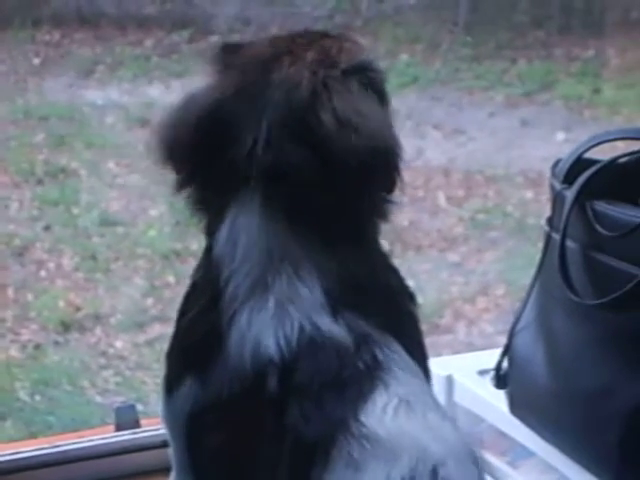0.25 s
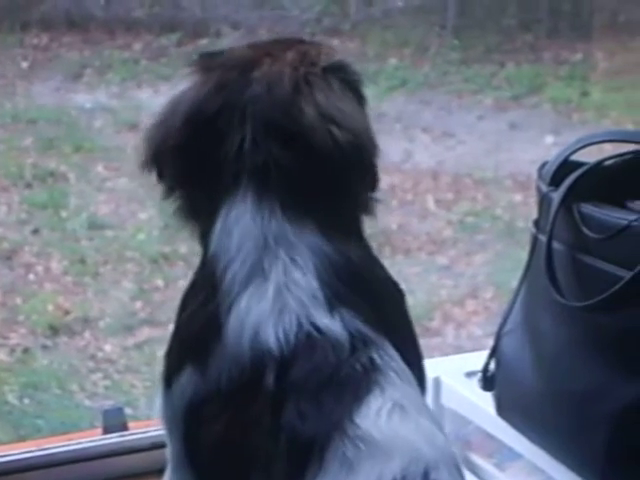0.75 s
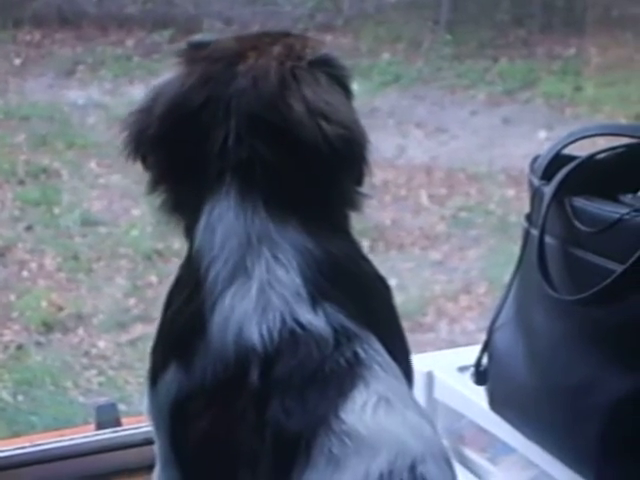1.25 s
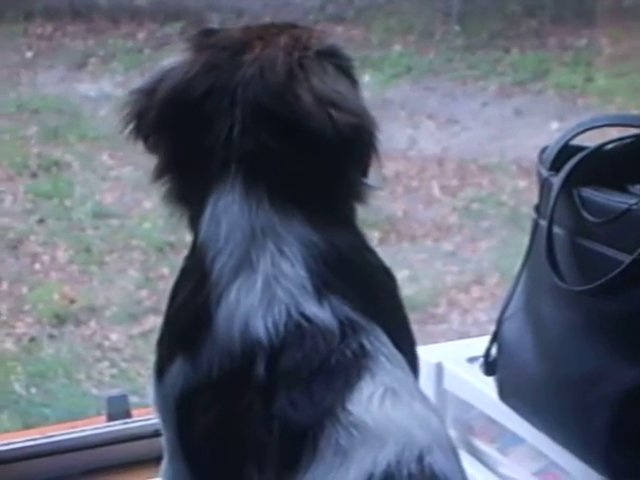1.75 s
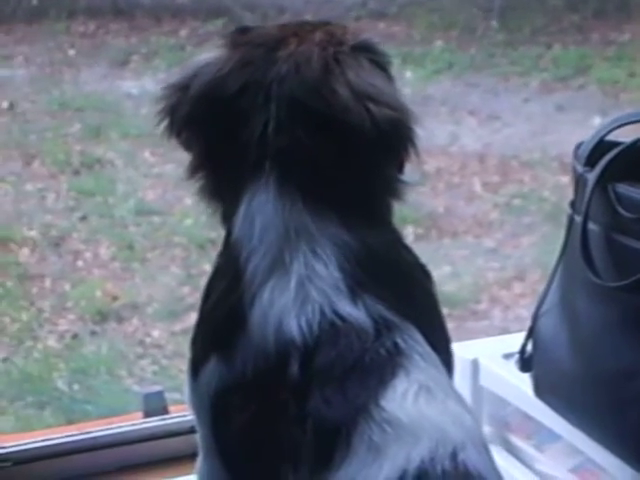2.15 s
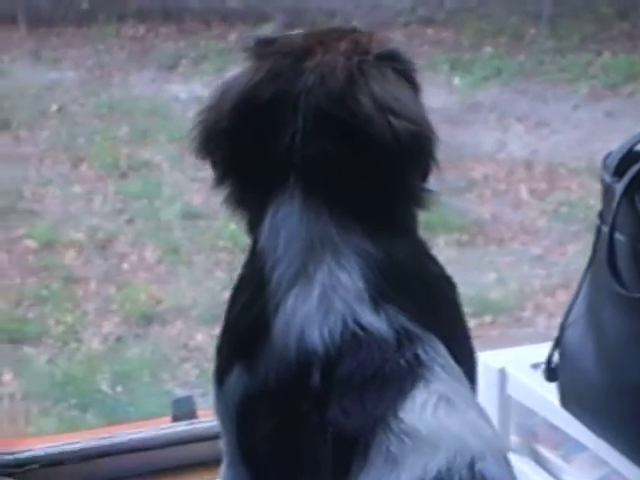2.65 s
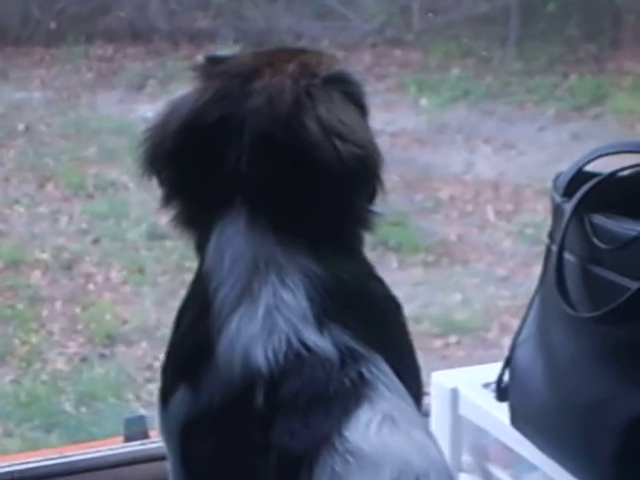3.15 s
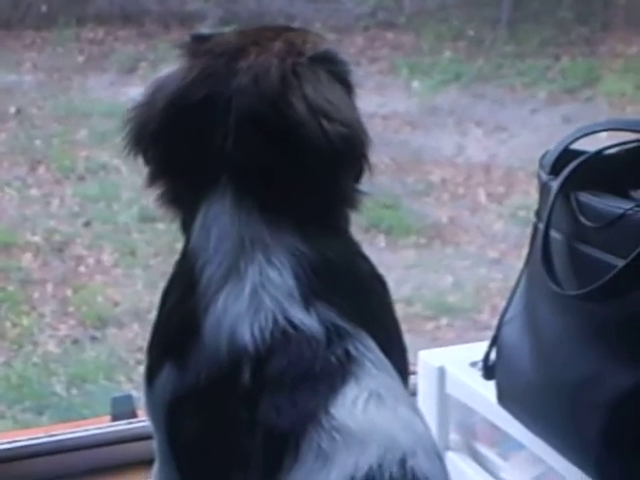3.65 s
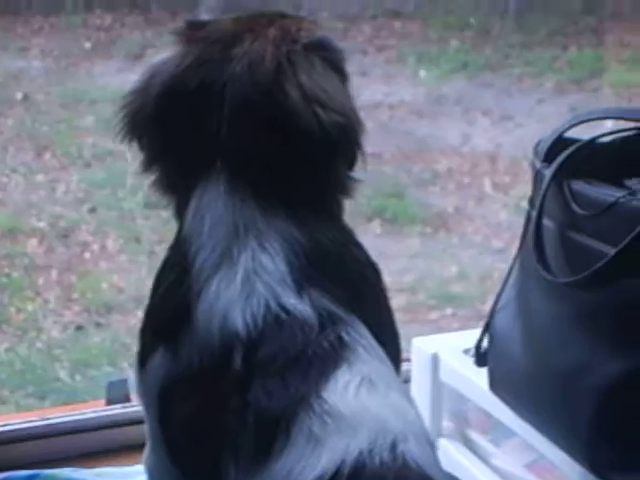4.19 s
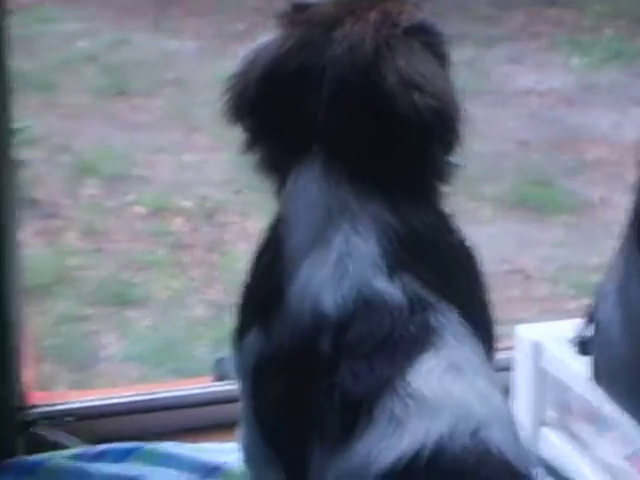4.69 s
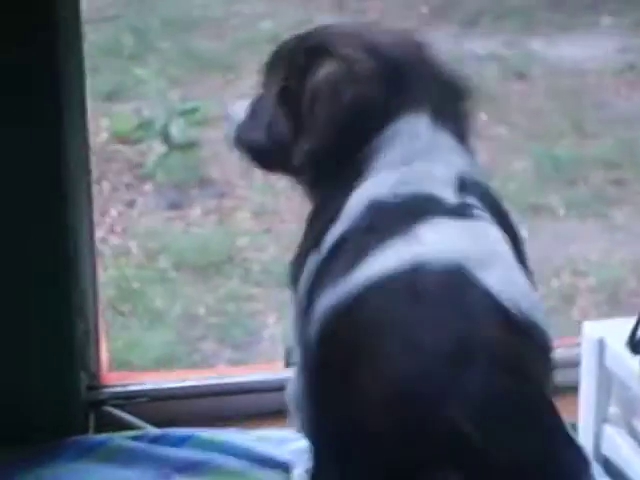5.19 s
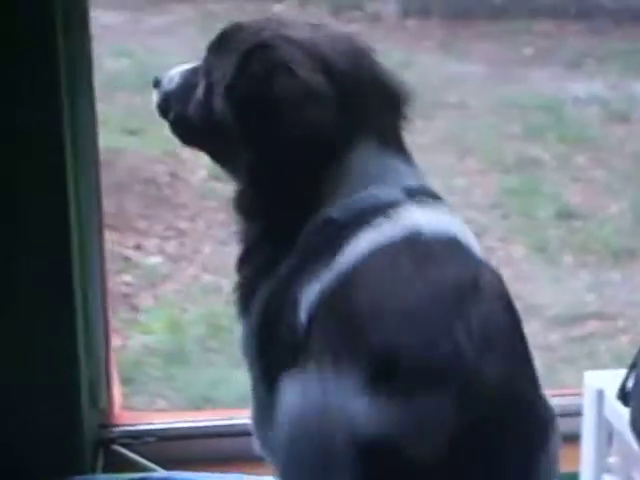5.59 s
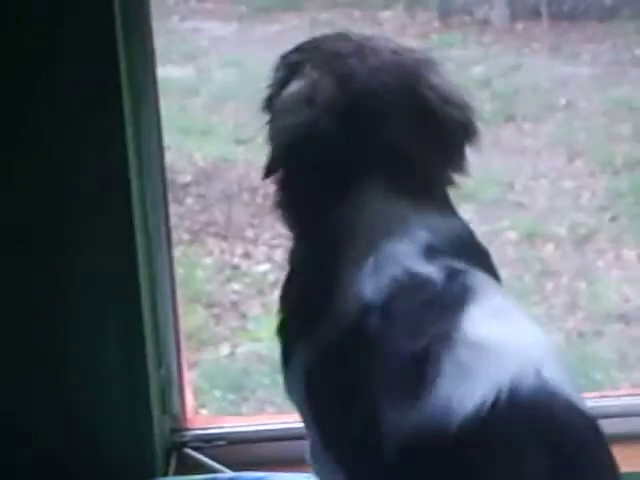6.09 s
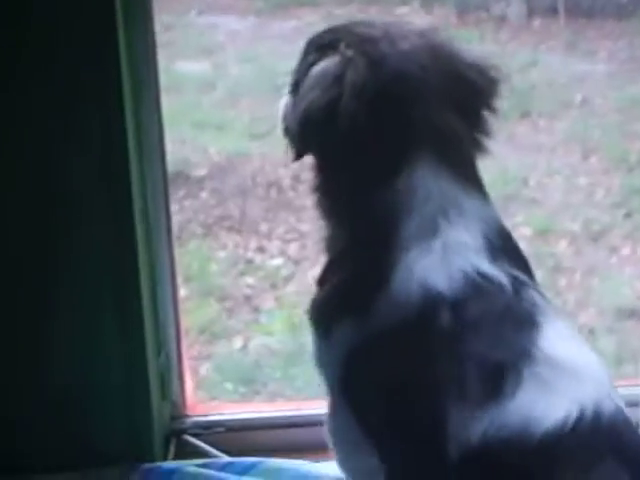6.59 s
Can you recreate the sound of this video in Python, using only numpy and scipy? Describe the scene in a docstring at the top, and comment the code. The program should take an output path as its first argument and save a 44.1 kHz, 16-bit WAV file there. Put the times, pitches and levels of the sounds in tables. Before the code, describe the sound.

A young dog chuffs, barks sharply, sniffs and growls low, then barks again and chuffs twice, close by in a small room.

```python
"""A young dog at a window, close to the microphone in a small room, is alarmed by something outside.
It chuffs (muffled half barks), barks, sniffs, growls, barks again into a snarl and chuffs some more.
Its voice is the vocal folds pulsing through throat and mouth; its sniffs and snorts are rushing air.
The two full barks overload the microphone. A few dry ticks sound, and a soft hiss, a low drone
and a thin whine lie underneath."""
import sys
import numpy as np
from scipy import signal
from scipy.fft import rfft, irfft, next_fast_len
from scipy.io import wavfile
from scipy.ndimage import uniform_filter1d

SR = 44100
rng = np.random.default_rng(int(sys.argv[2]) if len(sys.argv) > 2 else 0)


def pcm_store(signal):
    """Save signal as 16-bit PCM."""
    levels = np.round(np.clip(np.atleast_2d(signal), -1, 1) * 32767)
    wavfile.write(sys.argv[1], SR, levels.astype(np.int16).T)


N = 301400

# A small dog gives off little bass. Each row: frequency in Hz, gain in dB.
SMALL_BODY = [(60, -25), (100, -11.5), (145, 0)]


def amp(db):
    """Turns decibels into a number to multiply by."""
    return 10 ** (np.asarray(db) / 20)


def evened(x):
    """Scales a signal so that its average strength (rms) is 1."""
    return x / np.sqrt(np.mean(x ** 2) + 1e-20)


def steadied(x, size=700):
    """Holds the strength near 1 over every stretch of `size` samples."""
    return x / np.sqrt(abs(uniform_filter1d(x ** 2, size)) + 1e-20)


def look_up(points, hz):
    """Reads between the rows of a table, giving each octave equal space."""
    f, value = np.transpose(points)
    return np.interp(np.log(hz + 1), np.log(f + 1), value)


def ramp(t, start, length):
    """Goes from 0 to 1 in a straight line."""
    return np.clip((t - start) / length, 0, 1)


def blend(a, b, share):
    """Goes from a to b as share goes from 0 to 1."""
    return a + (b - a) * share


def add(mix, start, sound):
    """Adds a sound to the mix at `start` seconds."""
    part = mix[max(round(start * SR), 0):][:len(sound)]
    part += sound[:len(part)]


def noise(t):
    """White noise, one sample for each of the times t."""
    return np.resize(np.roll(rng.standard_normal(N), -int(t[0] * SR)), len(t))


def wobble(t, hz):
    """A random wavering of strength 1, mostly slower than hz."""
    f = np.fft.rfftfreq(len(t), 1 / SR)
    return evened(irfft(rfft(noise(t)) * np.exp(-(f / hz) ** 2) * (f > 0), len(t)))


def colour(x, points):
    """Turns frequencies up or down. Each point: frequency in Hz, gain in dB."""
    size = next_fast_len(len(x) + 4096)
    gain = amp(look_up(points, np.fft.rfftfreq(size, 1 / SR)))
    return irfft(rfft(x, size) * gain, size)[:len(x)]


def resonate(x, hz, width, order=1):
    """A resonance: keeps the sound near a fixed or moving hz; order 2 cuts the rest more steeply."""
    turn = np.exp(2j * np.pi * np.cumsum(hz * np.ones(len(x))) / SR)
    decay = np.exp(-np.pi * width * order / SR)
    shifted = x / turn
    for _ in range(order):
        shifted = signal.lfilter([1 - decay], [1, -decay], shifted + 1e-18)
    return 2 * (turn * shifted).real


def cavity(x, resonances):
    """Rings a sound as a hollow space does. Each resonance: frequency in Hz, width in Hz, gain in dB."""
    size = next_fast_len(len(x) + 2048)
    f = abs(np.fft.fftfreq(size, 1 / SR))
    power = sum(amp(db) ** 2 / (1 + ((f - hz) / width) ** 2 * 2) ** 3 for hz, width, db in resonances)
    response = np.exp(np.conj(signal.hilbert(.5 * np.log(power + 1e-9))))  # rings after, never before
    return np.fft.ifft(np.fft.fft(x, size) * response).real[:len(x)]


def swell(t, peak, rise, fall):
    """A push of breath: rises smoothly, then dies away."""
    return np.exp(-(np.minimum(t - peak, 0) / rise) ** 2 - np.maximum(t - peak, 0) / fall)


def background(whine_hz=7418):
    """Room hiss, a low drone that swells once and sinks back, and a thin electronic whine."""
    # The tone of the quiet room. Each row: frequency in Hz, relative level in dB.
    hiss_shape = [(15, -8), (50, -3.5), (130, -6), (250, -15), (400, -20), (700, -21.5), (1400, -25),
                  (2100, -26), (3000, -26), (6000, -31.5), (10000, -34.5), (15000, -38)]
    t = np.arange(N) / SR
    hiss = amp(-65) * evened(colour(noise(t), hiss_shape))
    drone = evened(cavity(noise(t), [(74.5, 11, -3), (152, 46, -7)]))
    drone_db = -73 + 11.5 * np.exp(-((t - 1.5) / 1.9) ** 2)  # loudest at 1.5 seconds
    whine = np.sin(2 * np.pi * np.cumsum(whine_hz + 3 * wobble(t, 30)) / SR)
    return hiss + amp(drone_db) * drone + amp(-79) * whine


def vocal_folds(t, hz, rough, jitter, shimmer=.94, wobble_hz=220):
    """Pulses that get more uneven and breathy as `rough` nears 1; also returns their lowest tone."""
    rough = np.clip(rough, 0, 1)
    cycles = np.cumsum(hz * (1 + jitter * rough * wobble(t, wobble_hz))) / SR
    pulses = sum(np.cos(2 * np.pi * k * cycles) * (k * hz < SR / 2) for k in range(1, 37))
    pulses = evened(pulses) * (1 + shimmer * rough * wobble(t, wobble_hz))
    puffs = evened((.1 + np.exp(-(cycles % 1) / .3)) * noise(t))  # one puff of air in each cycle
    return np.sqrt(1 - rough) * pulses + np.sqrt(rough) * puffs, np.sin(2 * np.pi * cycles)


def window_echoes(x, share=.36):
    """The muzzle points at the glass, so close reflections smear a grunt's pulses."""
    # Each entry: extra travel time by way of the pane or its frame, in seconds.
    detours = [0.00097, .0017, .0029]
    delays = np.exp(-2j * np.pi * np.outer(detours, np.fft.rfftfreq(len(x), 1 / SR)))
    return irfft(rfft(x) * np.prod((delays - share) / (1 - share * delays), axis=0), len(x))


def muffle(x, hz):
    """Nearly closed lips dull everything above hz."""
    return signal.sosfilt(signal.butter(2, min(hz, SR / 3), fs=SR, output="sos"), x)


def chuffs():
    """Half barks: short, rough grunts behind the lips."""
    # Each row: peak time in seconds, level in dB, rise in seconds, pitch in Hz,
    # mouth resonance in Hz, lip cut-off in Hz.
    grunts = [(.129, -29, .0065, 187.4, 552.9, 700), (2.357, -30.5, .011, 148.9, 345, 1260),
              (5.579, -43, 0.01, 201.8, 1740, 3970), (5.656, -29.5, 0.0024, 147.5, 560, 1500),
              (5.673, -23.5, 0.0079, 134.8, 610, 2886), (6.624, -39.5, .002, 167.7, 333, 795),
              (6.671, -25, 0.012, 123.6, 350, 2600)]
    # The muzzle's resonances. Each row: frequency in Hz, width in Hz, gain in dB.
    muzzle = [(257, 130, -0.5), (348, 76, -2), (584, 77, -6.5), (840, 290, -5), (1250, 420, -10.5),
              (1680, 750, -9), (2420, 250, -17)]
    out = np.zeros(N)
    for peak, db, rise, hz, mouth_hz, lips_hz in grunts:
        t = peak + np.arange(-SR // 12, SR // 5) / SR
        pulses, _ = vocal_folds(t, hz, rough=.6, jitter=.23)
        grunt = colour(window_echoes(cavity(pulses, muzzle)), SMALL_BODY)
        grunt += amp(3.5) * resonate(grunt, mouth_hz, width=150)
        grunt = steadied(muffle(grunt, lips_hz), size=300)
        add(out, t[0], amp(db) * grunt * swell(t, peak, rise, fall=.016))
    return out


def snorts():
    """Air rushes out through the nose after the stronger chuffs."""
    # Each row: peak time in seconds, level in dB, nose size as a factor (bigger sounds lower).
    blows = [(.163, -35.5, 1.06), (2.383, -38.5, 1.044), (5.687, -35.5, 1.008), (6.695, -29, 0.976)]
    # The nose's resonances. Each row: frequency in Hz at size 1, width in Hz, gain in dB.
    nose = [(860, 670, 1.5), (1680, 660, -4), (2654, 360, -2), (3900, 1300, -1.5), (4880, 400, -2),
            (6220, 1200, -12), (9200, 5600, -24)]
    out = np.zeros(N)
    for peak, db, size in blows:
        t = peak + np.arange(-SR // 12, SR // 5) / SR
        resonances = [(hz / size, width, gain) for hz, width, gain in nose]
        air = evened(cavity(noise(t) * amp(wobble(t, 300)), resonances))
        add(out, t[0], amp(db) * air * swell(t, peak, rise=.02, fall=.023))
    return out


def voice(t, effort_db, hz, rough, mouth_hz, throat,
          tone_db, mouth_db, mouth_width, open_db, shut_hz, jitter):
    """The vocal folds sound through throat, moving mouth and lips; returns start time and sound."""
    pulses, lowest_tone = vocal_folds(t, hz, rough, jitter)
    sound = cavity(pulses, throat)
    sound = steadied(sound + amp(mouth_db) * resonate(sound, mouth_hz, mouth_width))
    sound += amp(tone_db) * (1 - rough) * lowest_tone  # even cycles carry a strong lowest tone
    lips_open = amp(np.minimum(effort_db - open_db, 0))  # the lips part only with enough effort
    sound = blend(muffle(sound, shut_hz), sound, lips_open)
    return t[0], amp(effort_db) * steadied(sound, size=350) * signal.windows.tukey(len(t), .04)


def bark_motion(at, hold, release, db, hz, climb, wide_rough, wide_hz):
    """A bark starts low and quiet behind the lips, snaps open, then breaks up as the jaw half closes."""
    lead_s, snap_s, swell_s = .048, .009, .012
    shut_mouth_hz, half_mouth_hz, sag_db_per_s = 335, 1520, -38
    t = np.arange(-lead_s, hold + release, 1 / SR)
    lead = ramp(t, -lead_s, lead_s + swell_s)
    held_s = np.clip(t, 0, hold)
    fade = ramp(t, hold, release)
    opening = ramp(t, -lead_s, lead_s - snap_s) ** 3.5  # the jaw opens slowly at first, then fast
    closing = ramp(t, start=.053, length=.019)
    attack_db = np.interp(t, [-lead_s, -snap_s, 0, swell_s], [-36, -18.5, -5, 0])
    break_db = -3 * np.sin(np.pi * closing)
    effort_db = db + attack_db + sag_db_per_s * held_s + break_db - 18 * fade
    pitch = (hz + climb * held_s) * blend(.44, .99, lead) * blend(.99, .85, fade)
    rough = blend(blend(.22, wide_rough, lead), .74, closing)
    mouth_hz = blend(blend(shut_mouth_hz, wide_hz, opening), half_mouth_hz, closing)
    return at + t, effort_db, pitch, rough, mouth_hz


def barks():
    """Two full barks: the voice bursts out through a wide throat, then through a half-open one."""
    # Each row: time the lips part, hold and release in seconds, level in dB, base pitch in Hz, its
    # climb in Hz per second, then roughness (0 to 1) and mouth resonance in Hz with the jaw wide.
    calls = [(.321, .075, .042, -5.7, 680, 1300, .45, 2560), (4.965, .115, .005, -6.7, 592, 130, .18, 2190)]
    # Throat resonances, jaw wide and half open. Each row: frequency in Hz, width in Hz, gain in dB.
    wide_throat = [(695.4, 240, 0), (1110, 410, -11), (1764, 530, -7), (2450, 1000, -8.5), (3740, 260, -9),
                   (5270, 1700, -26.5), (8617, 3300, -33.5)]
    half_throat = [(588.5, 130, 4), (905, 150, -6.5), (1235, 100, -8.5), (1457, 210, -4.5),
                   (1969, 244, -8.5), (2672, 930, -17.5), (3740, 340, -11.5), (4250, 390, -20),
                   (8760, 3500, -36.5)]
    out = np.zeros(N)
    add(out, *voice(*bark_motion(*calls[0]), wide_throat, tone_db=-6.5, mouth_db=9.5,
                    mouth_width=240, open_db=-19, shut_hz=410, jitter=.08))
    add(out, *voice(*bark_motion(*calls[1]), half_throat, tone_db=3, mouth_db=10,
                    mouth_width=340, open_db=-24.5, shut_hz=500, jitter=.1))
    return out


def ticks():
    """Tiny dry clicks, a fraction of a millisecond long."""
    # Each row: start in seconds, peak level in dB.
    clicks = [(.402, -3), (.435, -10), (0.4694, -15.5), (2.436, -33), (4.469, -38), (4.669, -30.5),
              (5.203, -24), (5.269, -22), (5.736, -29)]
    out, age = np.zeros(N), np.arange(64) / SR
    for start, db in clicks:
        add(out, start, amp(db) * np.exp(-age / .00006) * np.cos(2 * np.pi * 4000 * age))
    return out


def sniff(peak, db, rise, fall, hz):
    """Grainy air in the nostrils, with one brighter band around hz."""
    t = peak + np.arange(-SR // 5, SR // 3) / SR
    grainy = noise(t) * amp(3 * wobble(t, 250))
    air = colour(grainy, [(200, -11), (600, -.5), (2500, -2), (6500, -5.5), (10000, -22)])
    air = evened(air + amp(-.5) * resonate(air, hz, width=1100, order=2))
    return t[0], amp(db) * air * swell(t, peak, rise, fall)


def sniffing(sharp_rise_s=.0032, snuffles_per_s=1.2):
    """The dog scents the air: sharp sniffs, slow draws and faint, irregular snuffles."""
    # Each row: peak time in seconds, level in dB, fall in seconds, bright band in Hz.
    sharp_sniffs = [(0.81, -52.5, 0.019, 5720), (1.028, -53.5, 0.037, 6600), (1.26, -59, 0.034, 2760),
                    (1.599, -65.5, 0.064, 2570), (1.908, -62, 0.068, 3210), (3.238, -54, 0.012, 2195),
                    (3.47, -68, 0.027, 2180), (3.862, -65, 0.014, 2990), (4.02, -69, 0.025, 4330),
                    (5.823, -56.5, 0.014, 5220), (6.238, -63, .025, 1486)]
    # Each row: peak time in seconds, level in dB, rise in seconds.
    slow_draws = [(1.975, -60, .03), (4.78, -70.5, 0.22), (5.2, -60, 0.085), (5.521, -59.5, 0.12),
                  (6.38, -69.5, 0.09)]
    out = np.zeros(N)
    for peak, db, fall, hz in sharp_sniffs:
        add(out, *sniff(peak, db, sharp_rise_s, fall, hz))
    for peak, db, rise in slow_draws:
        add(out, *sniff(peak, db, rise, fall=.75 * rise, hz=5300))
    chances = rng.uniform(-1, 1, (int(snuffles_per_s * N / SR), 3))
    for k, (shift, strength, brightness) in enumerate(chances):
        peak = (k + 1 + shift / 2) / snuffles_per_s
        db, hz = -68.5 + 3 * strength, 3000 * 2 ** (brightness / 2)
        add(out, *sniff(peak, db, sharp_rise_s, fall=.022, hz=hz))
    return out


def growls():
    """Slack vocal folds flap in threes, two strong and one very weak, and ring chest and closed muzzle."""
    # Each row: start and length in seconds, full level in dB, build-up time in seconds,
    # cycles per second at first and once settled, rasp level in dB relative to the ringing.
    rumbles = [(1.772, .578, -45.5, 0.45, 27.9, 25, -13.5), (4.161, .78, -49, .078, 35.5, 25, -16)]
    # Each entry: strength of one flap of the cycle, in dB.
    flap_db = (0, -2, -22)
    # What rings behind closed lips. Each row: frequency in Hz, level in dB, seconds to fade by 60 dB.
    chest = [(152, -7, .125), (255, -4.5, .1), (335, 5.5, .06), (385, -8, .05), (562, -14, .045),
             (900, -22, .04), (1030, -23, .04)]
    # The rasp of air between flaps. Each row: frequency in Hz, width in Hz, gain in dB.
    rasp = [(750, 700, -2), (2520, 200, -9.5), (4950, 580, -11), (7300, 4500, -22)]
    out, age = np.zeros(N), np.arange(4000) / SR
    ring = sum(amp(db - 60 * age / fade_s) * np.sin(2 * np.pi * hz * age) for hz, db, fade_s in chest)
    ring *= 1 - np.exp(-age / .0014)  # soft tissue closes without a click
    puff = age * np.exp(-age / .006)  # follows each flap
    for start, length, full_db, build, first_rate, settled_rate, rasp_db in rumbles:
        t = start + np.arange(0, length, 1 / SR)
        weakness = np.exp(-(t - start) / build)
        rate = blend(first_rate, settled_rate, ramp(t, start, length=.36)) * (1 + .02 * wobble(t, 40))
        flap_count = np.floor(np.cumsum(len(flap_db) * rate) / SR).astype(int)
        place = flap_count % len(flap_db)
        held_back_db = -15 * weakness * (place > 0)  # the later flaps join in as pressure builds
        kick_db = np.take(flap_db, place) + held_back_db + wobble(t, 60)
        kicks = np.diff(flap_count, prepend=0) * amp(kick_db)
        body = colour(signal.fftconvolve(kicks, ring)[:len(t)], SMALL_BODY)
        air = cavity(noise(t), rasp) * signal.fftconvolve(kicks, puff)[:len(t)]
        loudness = amp(full_db - 26 * weakness) * signal.windows.tukey(len(t), .03)
        add(out, start, loudness * (evened(body) + amp(rasp_db) * evened(air)))
    return out


def snarl(start=5.075, attack_s=.018, hold_s=.22, release_s=.073):
    """The second bark ends with bared teeth, then turns quieter, lower and darker as the lips close."""
    # Throat resonances, jaw nearly shut. Each row: frequency in Hz, width in Hz, gain in dB.
    shut_throat = [(334.2, 180, 2), (596, 76, -9), (890, 200, -6.5), (1291, 300, -5.5), (1934, 330, -6.5),
                   (3730, 300, -7.5), (4300, 200, -18), (8000, 5000, -38)]
    t = np.arange(0, attack_s + hold_s + release_s, 1 / SR)
    closing = ramp(t, start=.072, length=.025)
    faded = 1 - ramp(t, 0, attack_s) + ramp(t, attack_s + hold_s, release_s)
    effort_db = blend(-26.5, -36, closing) - 28 * faded
    out = np.zeros(N)
    add(out, *voice(start + t, effort_db, hz=blend(156, 139.5, closing), rough=blend(.62, 1.32, closing),
                    mouth_hz=blend(1347.5, 335, closing), throat=shut_throat, tone_db=-8.5,
                    mouth_db=4, mouth_width=160, open_db=-25.5, shut_hz=1700, jitter=.25))
    return out


def room(x, echo_db=-8, onset_s=.0059):
    """Adds the dense echoes of a small furnished room, each band dying at its own speed."""
    # Each row: frequency in Hz, seconds to fade by 60 dB.
    fade_times = [(120, 0.42), (300, 0.13), (700, .23), (1600, 0.22), (3800, 0.2), (4800, 0.27),
                  (10000, .15)]
    echoes = rng.standard_normal(SR // 2) * (rng.random(SR // 2) < .2)
    hz, t, bands = signal.stft(echoes, SR, nperseg=256)
    bands *= amp(-60 * t / look_up(fade_times, hz)[:, None])
    _, tail = signal.istft(bands, SR, nperseg=256)
    tail *= 1 - np.exp(-(np.arange(len(tail)) / SR / onset_s) ** 2)
    return x + amp(echo_db) * signal.fftconvolve(x, tail / np.linalg.norm(tail))[:N]


def scene():
    """The dog in its room, with the ticks and the background, as one channel."""
    dog = chuffs() + snorts() + barks() + sniffing() + growls() + snarl()
    return (room(dog) + ticks() + background())[None]


def record(dry, ceiling=.68, bias=.016, top_hz=15500):
    """The microphone dulls the treble and its overloaded input flattens the peaks of the barks."""
    # The microphone's tone. Each row: frequency in Hz, gain in dB.
    microphone = [(20, -1), (9800, -1), (10800, -7), (11600, -16), (12400, -23), (15000, -26)]
    driven = colour(dry[0], microphone) / ceiling
    driven += bias * np.tanh(driven) ** 2  # makes the wave slightly lopsided
    flattened = driven / (1 + driven ** 8) ** (1 / 8)
    distortion = colour(flattened - driven, [(10000, 0), (12000, -11)])  # its highest fizz is softened
    treble_cut = signal.firwin(511, top_hz, window=("kaiser", 9), fs=SR)
    return signal.oaconvolve(ceiling * (driven + distortion), treble_cut, "same")[None]


dry = scene()
out = record(dry)
pcm_store(out)
```